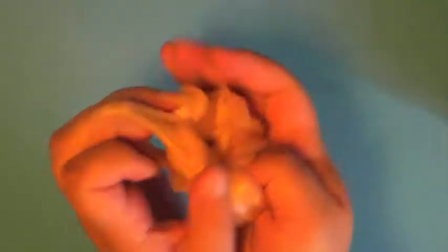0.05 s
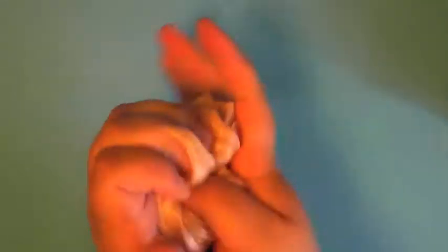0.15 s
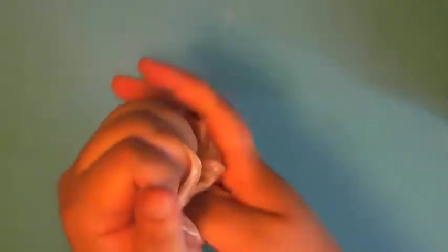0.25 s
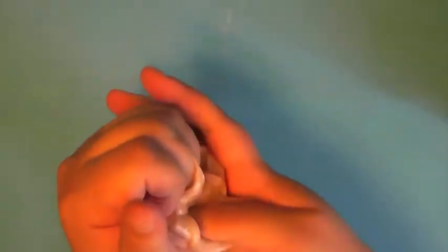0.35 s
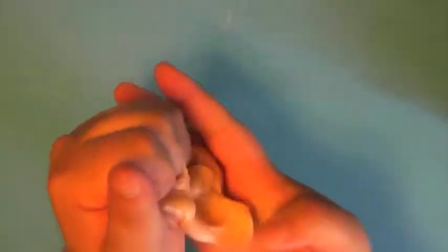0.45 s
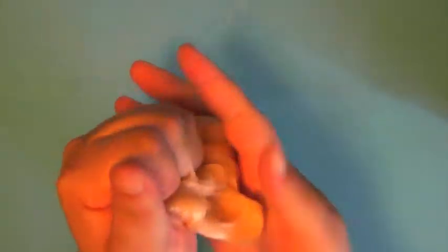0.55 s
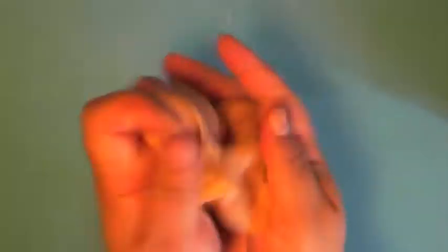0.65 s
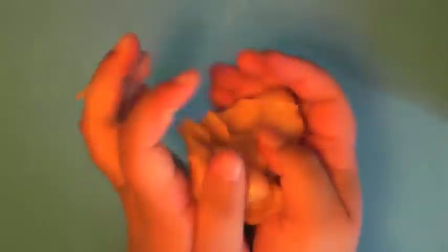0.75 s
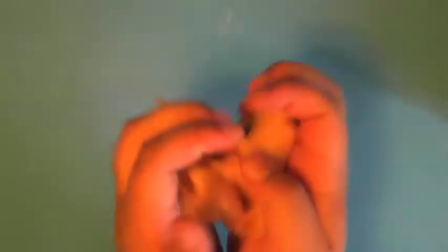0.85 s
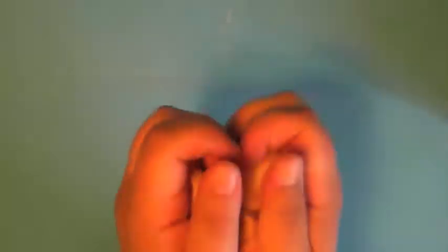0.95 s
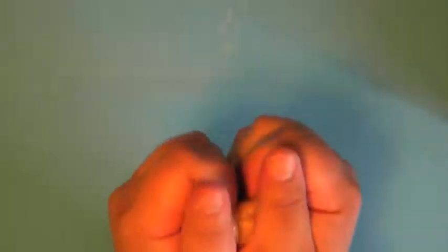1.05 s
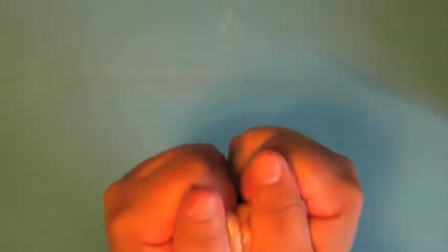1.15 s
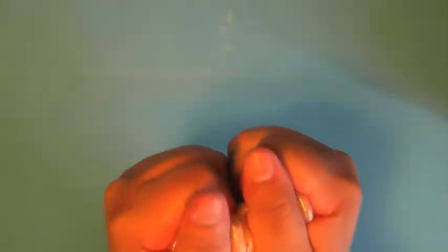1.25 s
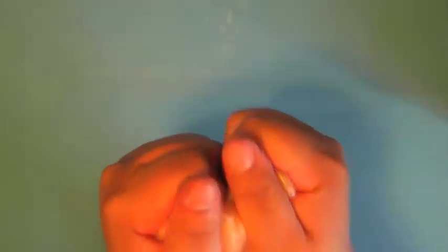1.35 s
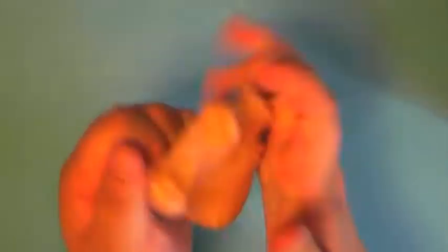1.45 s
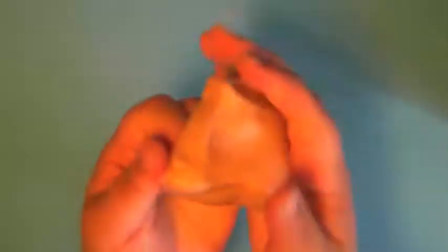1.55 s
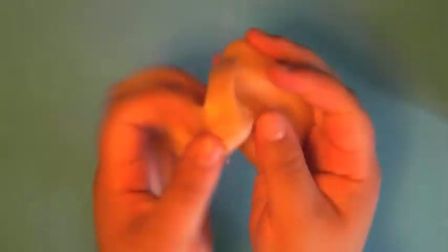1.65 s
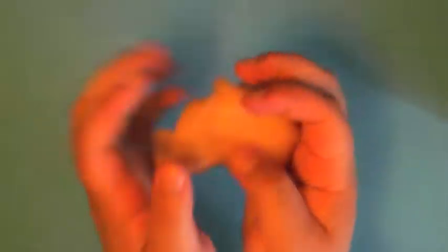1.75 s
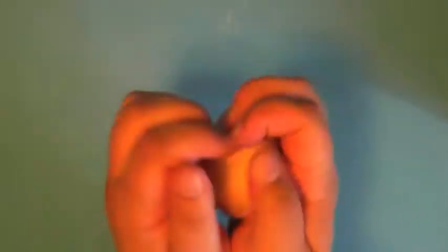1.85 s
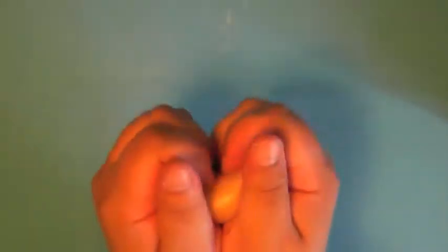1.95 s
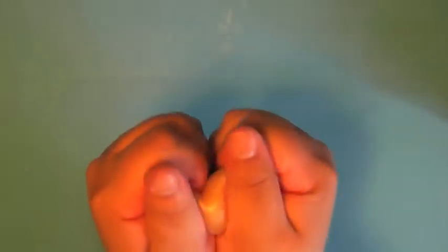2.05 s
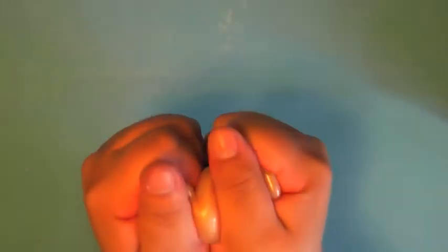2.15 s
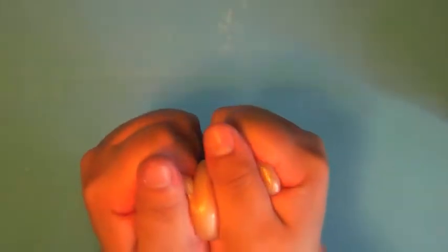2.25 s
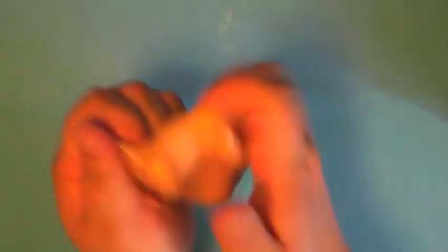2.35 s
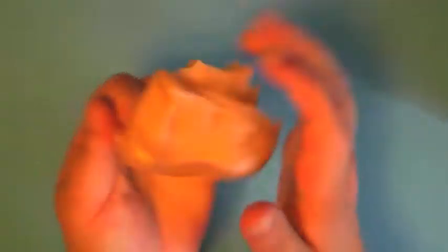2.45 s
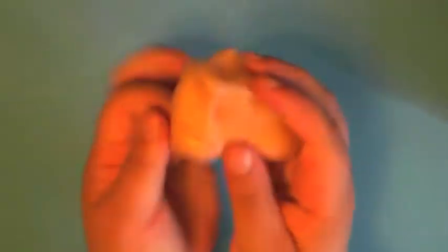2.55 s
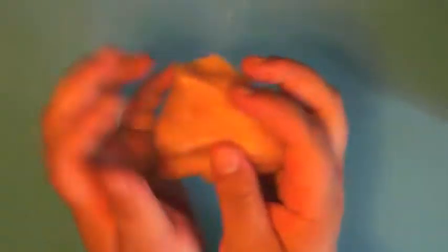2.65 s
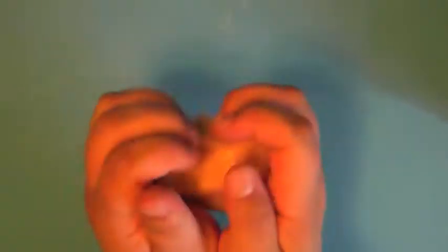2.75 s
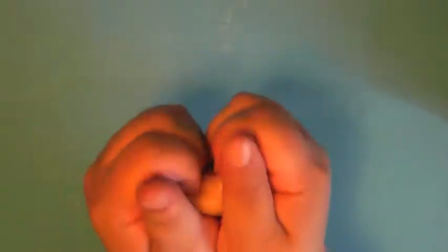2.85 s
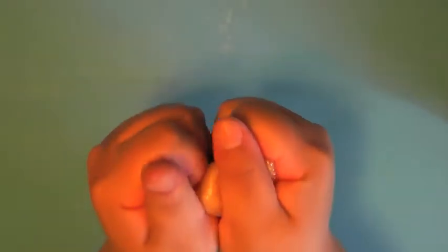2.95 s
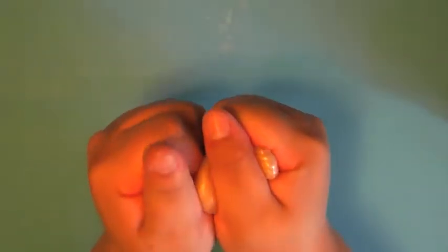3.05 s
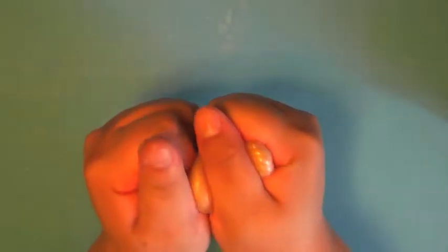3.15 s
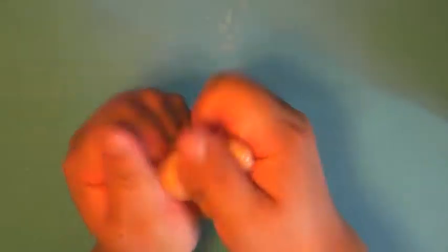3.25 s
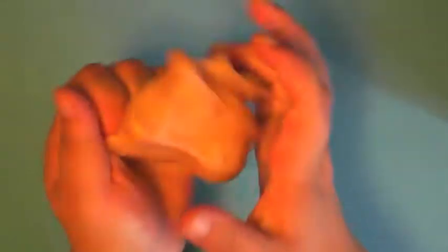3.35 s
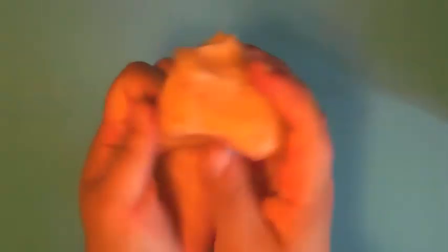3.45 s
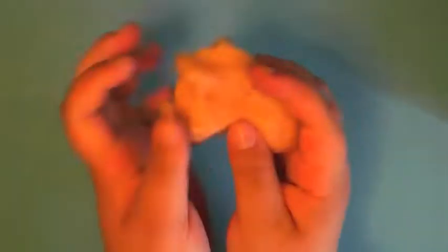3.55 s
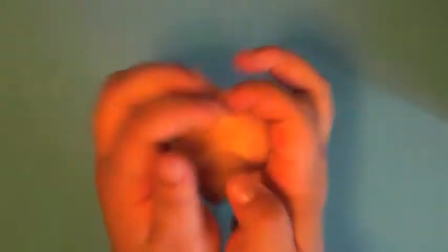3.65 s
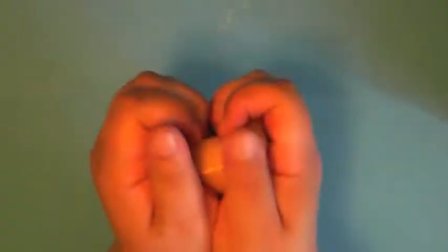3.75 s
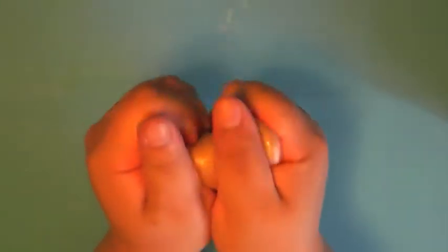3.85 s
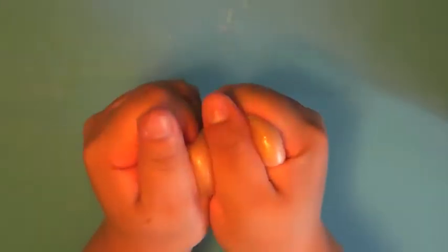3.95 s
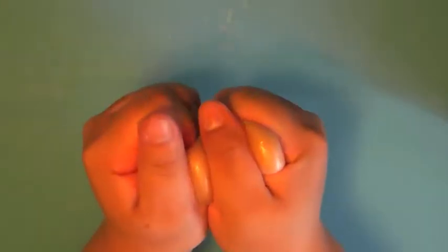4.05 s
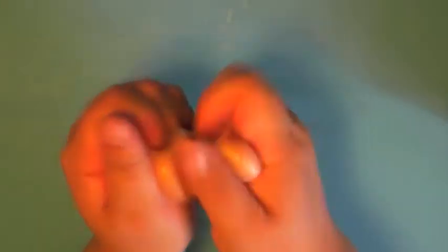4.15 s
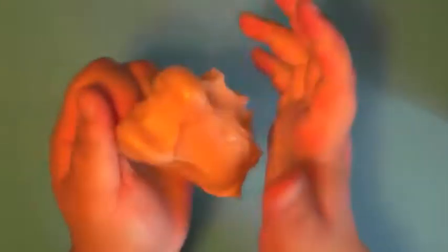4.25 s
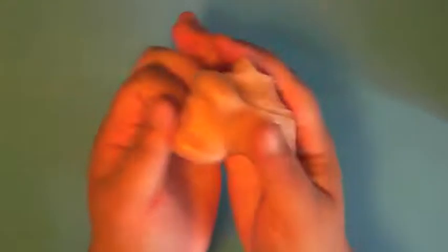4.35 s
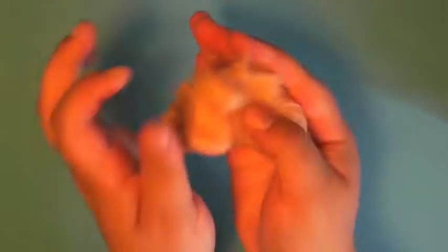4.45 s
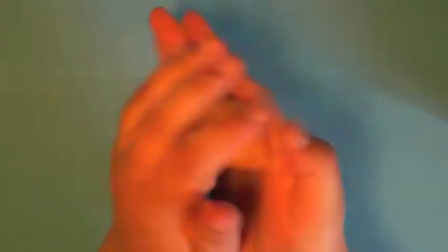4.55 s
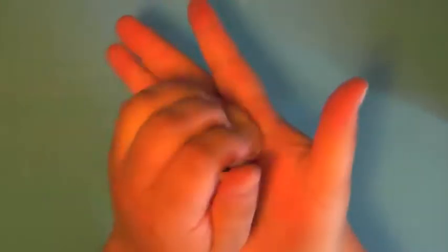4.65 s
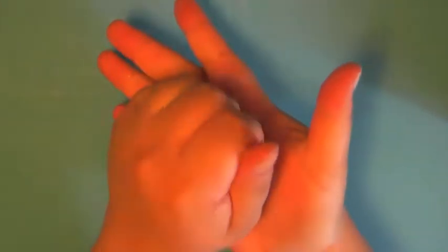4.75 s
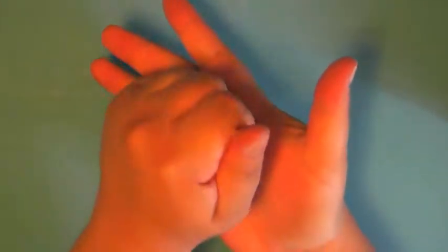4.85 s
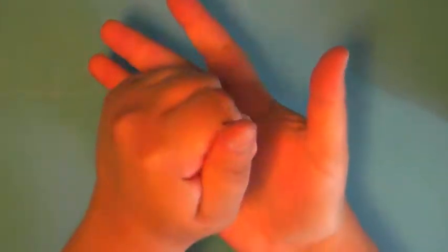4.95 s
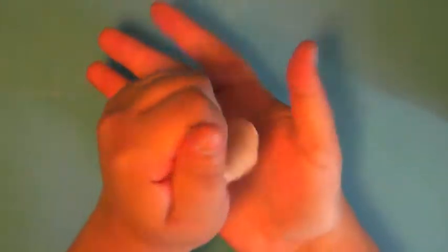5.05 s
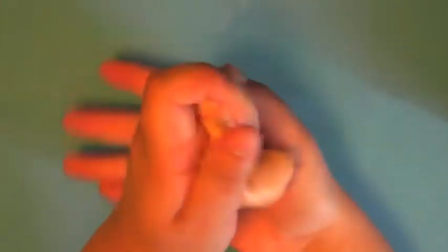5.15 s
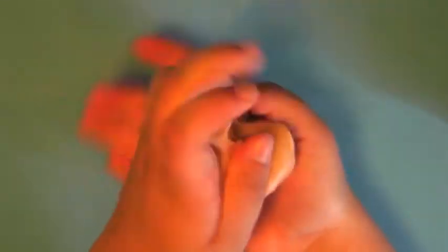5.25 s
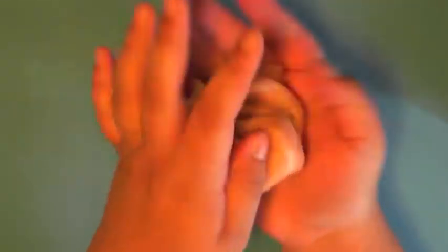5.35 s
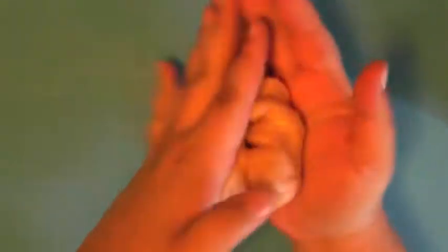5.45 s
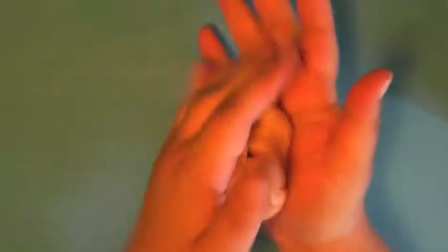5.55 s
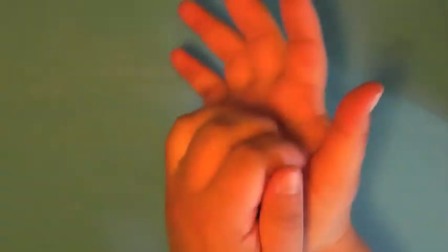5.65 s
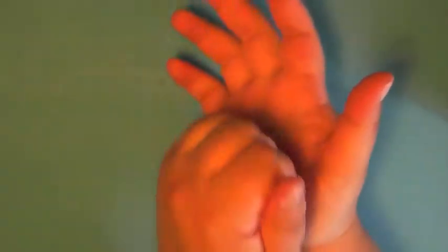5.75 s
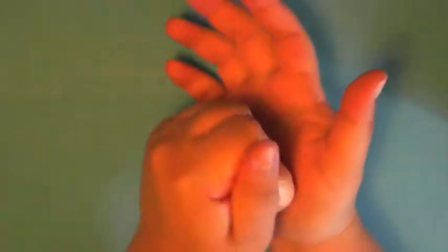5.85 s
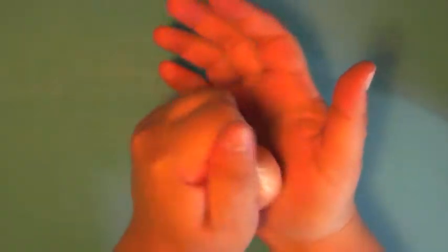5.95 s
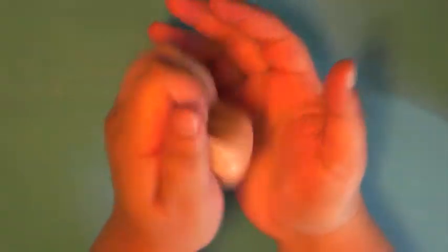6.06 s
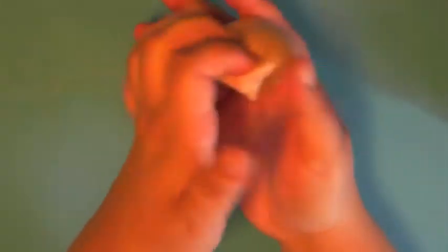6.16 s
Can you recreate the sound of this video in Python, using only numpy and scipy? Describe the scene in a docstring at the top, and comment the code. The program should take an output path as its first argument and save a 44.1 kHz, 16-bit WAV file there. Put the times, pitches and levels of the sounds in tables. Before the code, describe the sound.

Hands knead sticky wet slime up close, squishy fizzing peels alternating with clusters of sharp snapping pops and small low thuds in a quiet humming room.

```python
"""A quiet room, where two hands knead a lump of sticky slime close to a pair of microphones.
Over a patchy room hum, wet films peel off the skin stroke by stroke: trains of tiny rings and hiss make a
squishy fizz. Trapped air pockets burst as short puffs of ringing noise with a brief room tail. The hardest
pops saturate the microphones and come with low thuds, and gain control ducks the whole sound after loud pops."""
import sys
import numpy as np
from scipy import signal
from scipy.fft import rfft, irfft
from scipy.io import wavfile
from scipy.ndimage import uniform_filter1d

SR = 44100
rng = np.random.default_rng(int(sys.argv[2]) if len(sys.argv) > 2 else 0)


def unload_audio(sound):
    """Save the sound as a 16-bit wav file, at the path given as the first command line argument."""
    columns = np.transpose(np.atleast_2d(sound))
    # keep every value between -1 and 1, then stretch to whole-number steps
    steps = np.round(np.clip(columns, -1, 1) * 32767)
    wavfile.write(sys.argv[1], SR, steps.astype(np.int16))


N = 273420

# Strokes of slime peeling off skin. Each row: peak in seconds, rise in seconds, fall in seconds, fizz level
# in dB, squelch level in dB, pitch of the low hollow in Hz, pitch of the high hollow in Hz.
PEEL_STROKES = [(0.15, 0.19, 0.15, -52.5, -53.5, 1790, 4300),
                (0.45, 0.089, 0.087, -39.5, -36.5, 2180, 4300), (0.767, 0.11, 0.061, -35, -40, 1740, 4200),
                (0.87, 0.16, 0.11, -57.5, -65, 1800, 4160), (1.08, .1, 0.038, -52.5, -63, 1800, 4340),
                (1.24, .08, 0.08, -55, -47, 1800, 4200), (1.497, 0.074, 0.059, -35.5, -39.5, 2010, 4300),
                (1.64, 0.27, 0.07, -54.5, -65, 1810, 4150), (1.736, 0.087, 0.069, -41, -43, 1780, 3430),
                (1.82, 0.03, 0.055, -49, -58, 1730, 3830), (2.44, 0.076, 0.067, -35.5, -38, 686, 4400),
                (2.588, 0.093, 0.13, -41.5, -41, 1780, 3640), (2.99, 0.06, 0.12, -52.5, -66, 1620, 4300),
                (3.38, 0.096, 0.09, -37, -44, 1760, 4330), (3.491, 0.034, 0.045, -44, -46.5, 1700, 3780),
                (3.588, 0.087, 0.056, -39, -46, 1800, 8700), (3.698, 0.063, 0.024, -52, -63, 1760, 4030),
                (3.87, 0.12, 0.081, -59, -74, 1770, 4200), (4.248, 0.059, 0.062, -36, -42, 980, 3800),
                (4.287, 0.065, 0.039, -40, -45, 2395, 3600), (4.462, 0.15, 0.091, -42.5, -46.5, 1690, 3840),
                (4.62, 0.11, 0.13, -60, -69, 820, 2780), (4.92, 0.19, 0.1, -56, -70, 1760, 4200),
                (5.217, 0.074, 0.066, -36, -45, 1090, 7200), (5.315, 0.073, 0.045, -42.5, -45, 1820, 3500),
                (5.375, 0.068, 0.079, -42, -52.5, 1740, 8500), (5.519, 0.036, 0.035, -46, -53, 1760, 4100),
                (5.84, 0.22, .3, -58, -68, 1780, 4400), (6.19, .18, 0.15, -42.5, -48.5, 667, 4300)]
# The hardest pops. Each row: start in seconds, thud level in dB, level of the left-against-right swing in dB,
# its side (+1 left pushes, -1 right pushes), level of the fizz let go in dB.
HARD_POPS = [(0.4991, -20.5, -20, 1, -49), (0.5245, -30, -37, 1, -53), (0.5859, -20, -26, -1, -66),
             (1.1374, -33, -34, 1, -35), (1.148, -16.5, -19, 1, -42), (1.1924, -15, -20, 1, -29),
             (1.3, -17, -19, 1, -44), (1.3316, -28, -12, 1, -40), (2.0738, -19, -20, -1, -34),
             (2.109, -55, -20, 1, -62), (2.1297, -20, -12.5, 1, -44), (2.177, -58, -22, 1, -60),
             (2.214, -26, -5.5, -1, -53), (3.0318, -23.5, -17.5, 1, -48), (3.0458, -49, -14, -1, -40.5),
             (3.136, -13.5, -5, 1, -26.5), (3.9435, -19, -18, 1, -38), (3.9574, -20, -22, 1, -49),
             (4.0574, -13.5, -24, -1, -39.5), (4.9072, -27, -22, -1, -77), (4.9794, -27, -22, 1, -77),
             (5.9367, -41, -24, 1, -61), (5.9625, -24.5, -28, 1, -55)]


def gain_of(db):
    """Amplitude factor for a level in dB."""
    return 10 ** (np.asarray(db) / 20)


def evened(x):
    """Scales x to an rms of 1."""
    return x / np.sqrt(np.mean(x ** 2) + 1e-20)


def read(points, hz):
    """Reads a curve of (Hz, value) points, interpolated along log frequency."""
    f, value = np.transpose(points)
    return np.interp(np.log(hz + 1), np.log(f + 1), value)


def add(mix, s, sound):
    """Adds a sound to the mix from s seconds on, cut off at the end of the mix."""
    part = mix[..., round(s * SR):][..., :sound.shape[-1]]
    part += sound[..., :part.shape[-1]]


def coloured(x, spectrum):
    """Filters x by a curve of gains in dB, at rms 1."""
    gains = gain_of(read(spectrum, np.fft.rfftfreq(len(x), 1 / SR)))
    return evened(irfft(rfft(x) * gains, len(x)))


def wander(seconds):
    """Smoothed chance of rms 1: noise averaged twice over the given time."""
    size = max(round(seconds * SR), 2)
    return evened(uniform_filter1d(uniform_filter1d(rng.standard_normal(N), size), size))


def hum():
    """Room noise in drifting patches, left and right least alike around 1 kHz, with narrow whirrs in both."""
    # Spectrum of the room noise. Each row: frequency in Hz, relative level in dB per Hz.
    hum_shape = [(15, -40), (25, -55), (121, 5), (445, -1), (600, -6.5), (1180, -8), (1640, -14.5),
                 (1930, -18.5), (3700, -45), (5130, -95), (15200, -90), (16500, -30)]
    # Likeness of the two sides in the broad noise. Each row: frequency in Hz, correlation from 0 to 1.
    likeness = [(60, 0.34), (240, 0.4), (950, 0.073), (3770, 0.13), (15000, 0.48)]
    # Whirrs. Each row: centre in Hz, width in Hz, median level in dB against the broad noise.
    whirrs = [(459, 33, -11), (1639, 106, -10.5)]
    frames, hz = N // 256 + 5, np.fft.rfftfreq(1024, 1 / SR)
    a, b, c, d, patches = rng.standard_normal((frames, 513, 5)).T
    patches = evened(uniform_filter1d(uniform_filter1d(patches, 8, 0), 14, 1))
    same = np.clip(read(likeness, hz), -1, 1)[:, None]
    left = a + 1j * b
    right = same * left + np.sqrt(1 - same ** 2) * (c + 1j * d)
    spectra = np.array([left, right]) * gain_of(read(hum_shape, hz)[:, None] + 2 * patches)
    out = evened(signal.istft(spectra, nperseg=1024, noverlap=768)[1][:, :N])
    for centre_hz, width_hz, db in whirrs:
        band = signal.iirpeak(centre_hz, centre_hz / width_hz, SR)
        whirr = evened(signal.filtfilt(*band, rng.standard_normal(N)))
        out = out + gain_of(db + 2 * wander(0.084)) * whirr
    return gain_of(-53) * out


def grains(low_hz, high_hz, cycles, per_s, spread_db, count):
    """Tiny films snapping: short rings of rising pitch, each pitch on its own sparse train of clicks."""
    out = np.zeros(N)
    clump = gain_of(4.5 * wander(0.0036))  # films let go in clumps
    for hz in np.geomspace(low_hz, high_hz, count):
        u = np.arange(int(3 * cycles * SR / hz)) * hz / SR  # time in cycles
        ring = np.sin(2 * np.pi * u * (1 + 0.017 * u)) * np.exp(-u / cycles) * np.minimum(u, 1)
        ring = ring * hz ** .5 / np.linalg.norm(ring)
        snaps = rng.random(N) < per_s / count / SR * clump
        size = gain_of(spread_db * np.minimum(rng.exponential(1, N), 5))
        out += signal.oaconvolve(size * snaps, ring)[:N]
    return evened(out)


def swell(rise_s, fall_s):
    """A stroke of peak 1 with a round top, curving into silence at both ends."""
    t = np.arange(0, rise_s + fall_s, 1 / SR)
    ramp = np.clip(np.minimum(t / rise_s, (rise_s + fall_s - t) / fall_s), 0, 1)
    return np.sin(np.pi / 2 * ramp) ** 2.84  # a higher power makes the stroke more pointed


def efforts():
    """Gains of fizz and squelch: each stroke swells and ebbs, each hard pop lets a little more film go."""
    rest_fizz_db, rest_squelch_db = -61.5, -58  # always present beneath the strokes
    after_rise_s, after_fizz_s, after_squelch_s = 0.0027, 0.14, 0.074  # swell after a hard pop
    after_squelch_db = -14  # against the fizz let go
    fizz, squelch = np.zeros((2, N + SR))  # one second of lead-in, cut off below
    for s, rise_s, fall_s, fizz_db, squelch_db, _, _ in PEEL_STROKES:
        stroke = swell(rise_s, fall_s)
        add(fizz, 1 + s - rise_s, gain_of(fizz_db) * stroke)
        add(squelch, 1 + s - rise_s, gain_of(squelch_db) * stroke)
    for s, *_, fizz_db in HARD_POPS:
        add(fizz, 1 + s, gain_of(fizz_db) * swell(after_rise_s, after_fizz_s))
        add(squelch, 1 + s, gain_of(fizz_db + after_squelch_db) * swell(after_rise_s, after_squelch_s))
    return fizz[SR:] + gain_of(rest_fizz_db), squelch[SR:] + gain_of(rest_squelch_db)


def hollows():
    """Pitches of the low and high hollow: each stroke's pair is held until halfway up the next rise."""
    shift_s = 0.014  # time in which the hands find their next shape
    s, rise_s, *_, low_hz, high_hz = np.transpose(PEEL_STROKES)
    starts = np.maximum.accumulate(s - rise_s / 2)
    stroke = np.maximum(np.searchsorted(starts, np.arange(N) / SR) - 1, 0)
    return [uniform_filter1d(hz[stroke], round(shift_s * SR)) for hz in (low_hz, high_hz)]


def resonate(x, hz, width_hz):
    """Shifts the curve hz down to zero, smooths, and shifts back: a moving resonance, at rms 1."""
    turn = np.exp(2j * np.pi * np.cumsum(hz) / SR)
    r = np.exp(-np.pi * width_hz / SR)
    return evened((turn * signal.lfilter([1 - r], [1, -r], x / turn)).real)


def peel():
    """Fizz and squelch: grains over a fine wet hiss, ringing in the hollows, swelling with each stroke."""
    # Tone filters for the fizz and the squelch. Each row: frequency in Hz, relative gain in dB.
    fizz_shape = [(1180, -70), (2000, 10.5), (2490, -2.5), (3710, -0.5), (10700, -2), (15100, -7.5),
                  (16100, -38), (16500, -48)]
    squelch_shape = [(240, -46), (400, 11), (524, -2), (673, 9), (989, 5.5), (1820, 6), (2490, 0.5),
                     (4000, 6), (5200, -4), (8800, -120)]
    fizz_gain, squelch_gain = efforts()
    low_hz, high_hz = hollows()
    fizz = grains(2525, 14000, cycles=4.0, per_s=9000, spread_db=3.0, count=16)
    fizz = fizz + 0.34 * rng.standard_normal(N)
    squelch = grains(477, 3254, cycles=2.65, per_s=4000, spread_db=4.0, count=14)
    squelch = squelch + 1.1 * rng.standard_normal(N)
    fizz = coloured(fizz, fizz_shape) + 0.41 * resonate(fizz, high_hz, width_hz=510)
    clumps = gain_of(4 * wander(.012))  # the hollow opens and closes in wet clumps
    squelch = coloured(squelch, squelch_shape) + .6 * clumps * resonate(squelch, low_hz, width_hz=280)
    grip = gain_of(2 * wander(0.025))  # the skin grips and slips
    return grip * (evened(fizz) * fizz_gain + evened(squelch) * squelch_gain)


def small_pops():
    """Rows of small bursts, laid out like the air pockets, scattered by chance around the hard pops."""
    each, within_s = 3, .035  # pockets per hard pop, spread of their times
    when, level, pitch, length = rng.standard_normal((len(HARD_POPS) * each, 4)).T
    s = np.repeat([row[0] for row in HARD_POPS], each) + within_s * when
    db = -33 + 3 * level
    ring_hz = 9600 + 2200 * np.tanh(pitch)
    ms = .9 * gain_of(2.3 * length)
    return list(zip(s, db, ring_hz, ms))


def pops(skirt_db=-14, unlike=0.25, wider=2.16):
    """Each burst is a short puff of noise ringing around its pocket's pitch, with a wide skirt.
    Also gives the same energy summed over all directions, which is wider and feeds the room."""
    # Bursting air pockets. Each row: start in seconds, level in dB before the microphones saturate,
    # pitch of the ring in Hz, length scale in ms.
    air_pockets = [(0.1044, -37.5, 8500, 5.6), (0.2073, -21.5, 6900, 2.3), (0.331, -26.5, 4450, 0.89),
                   (0.3748, -35, 9700, 3.8), (0.4724, -17, 4600, 0.57), (0.4969, -4, 8300, 0.27),
                   (0.5236, -5, 7850, 0.75), (0.5556, -17.5, 8140, 1.1), (0.5846, 1.5, 8200, 0.9),
                   (0.617, -19.5, 11300, 1.3), (0.6779, -21, 9600, 2.3), (0.7296, -39, 5950, 4.3),
                   (0.9203, -39, 2980, 3.5), (0.9274, -35.5, 9800, 1.9), (1.0637, -33, 11300, 4),
                   (1.0707, -30.5, 5600, 3.4), (1.119, -22, 11700, 2), (1.1259, -11.5, 4700, 0.63),
                   (1.1366, -9, 5600, 0.89), (1.1486, -15, 5630, 3.3), (1.1673, -24, 6200, 2.2),
                   (1.1831, -13, 10300, 1.6), (1.1895, 7, 7340, 1.4), (1.198, -9, 10700, 3),
                   (1.2203, -24, 7500, 1.1), (1.2374, -24, 4630, 2.2), (1.254, -19, 11400, 1.1),
                   (1.2862, -14.5, 11100, 1), (1.2984, -7.5, 13500, 2), (1.3297, 6.5, 11040, 2.07),
                   (1.617, -40, 9700, 3.1), (1.987, -27.5, 6800, 2), (2.0352, -28, 4050, 2.2),
                   (2.0433, -21, 4170, 0.92), (2.046, -16.5, 3600, 1), (2.0604, -13, 11800, 0.8),
                   (2.0711, -6.5, 6400, 1.9), (2.082, -17, 10000, 1.1), (2.098, -17, 5000, 2.7),
                   (2.108, -11.5, 7160, 1.4), (2.1284, -1.5, 7500, 1.25), (2.158, -15, 10000, 1.1),
                   (2.1774, -10.5, 7700, 1.6), (2.1963, -20, 13500, 0.7), (2.2122, -11.5, 12000, 1.3),
                   (2.239, -27, 12100, 1.6), (2.2691, -26, 12800, 0.75), (2.3177, -33, 6400, 2.2),
                   (2.3649, -27, 9700, 0.51), (2.4848, -33.5, 7550, 9), (2.804, -37, 4120, 2),
                   (2.899, -52, 8900, 1.5), (2.949, -34.5, 4040, 2), (3.0137, -29, 8000, 1.8),
                   (3.0308, -18, 9500, 2.5), (3.0456, 9, 9840, 0.82), (3.072, -8, 7550, 1.3),
                   (3.0945, -12.5, 8300, 0.68), (3.1283, -19, 4360, 1.6), (3.1348, 12.5, 8250, 1.4),
                   (3.184, -14, 9000, 1.1), (3.2294, -25, 12100, 0.91), (3.3468, -16.5, 7850, 0.55),
                   (3.459, -36, 10500, 1.4), (3.4802, -40, 5900, 2.5), (3.7602, -36.5, 4130, 2.1),
                   (3.787, -42, 9500, 1), (3.8171, -26, 4350, 4), (3.8984, -34.5, 8900, 1.7),
                   (3.9195, -22, 4500, 0.49), (3.9424, -11.5, 8800, 1.3), (3.9574, -1.5, 7500, 1.4),
                   (3.9683, -19, 7400, 1.5), (4.0536, -23, 12300, 1.2), (4.0567, 4.5, 11830, 1.19),
                   (4.0704, -1, 10100, 0.43), (4.191, -40, 10000, 1.4), (4.3214, -28.5, 9350, 2.1),
                   (4.6275, -36.5, 2300, 2.7), (4.665, -50, 10500, 1.4), (4.767, -28, 5140, 1.6),
                   (4.8067, -18.5, 7860, 1.36), (4.8439, -27, 11900, 1.7), (4.8496, -21.5, 12400, 1.3),
                   (4.863, -27, 8000, 2.1), (4.8932, -24, 7800, 1.3), (4.9014, -24, 10400, 0.86),
                   (4.9057, -16, 12200, 0.93), (4.9313, -19, 9800, 0.45), (4.9482, -30, 10800, 1.1),
                   (4.9782, -17.5, 14400, 1.05), (5.155, -36, 5100, 1.5), (5.2082, -16.5, 10600, 0.56),
                   (5.2333, -47, 6130, 1.2), (5.4661, -41.5, 2200, 3.1), (5.7705, -31, 8900, 3.6),
                   (5.8184, -24.5, 3140, 0.63), (5.8698, -19, 9300, 0.95), (5.885, -17, 10400, 0.76),
                   (5.9059, -35.5, 7450, 8.5), (5.9346, -13, 9100, 0.89), (5.9612, -1, 10200, 0.91)]
    out, around = np.zeros((2, N)), np.zeros(N)
    hz, t = np.fft.rfftfreq(512, 1 / SR), np.arange(512) / SR
    rows = [*air_pockets, *small_pops()]
    puffs = rng.standard_normal((len(rows), 2, 512))
    skirt = gain_of(skirt_db) * hz / (hz + 500)
    for (s, db, ring_hz, ms), puff in zip(rows, puffs):
        off = (hz - ring_hz) / (1920 + 0.036 * ring_hz)  # the ring widens with its pitch
        tone = irfft(rfft(puff) * (np.exp(-(off / 0.7) ** 2 / 2) + skirt))
        tone = tone / np.sqrt(uniform_filter1d(tone ** 2, 24, mode="wrap"))  # the film tears at an even force
        u = t * 1000 / ms  # time in lengths
        decay = np.exp(-.4 * u - np.maximum(u - .8, 0) / .25)  # slow at first, then steep
        shape = gain_of(db) * np.minimum(t / .0001, 1) * decay
        apart = unlike * np.minimum(u, 1) * tone[1]  # a second noise, opposite left and right, grows in
        add(out, s, np.array([tone[0] + apart, tone[0] - apart]) * shape)
        bands = gain_of(5 * np.cos(hz / 520 + 2 * puff[0, 0]))  # chance ripple of broad bands in each room tail
        click = irfft(bands * np.exp(-(off / wider) ** 2 / 2) + skirt / 2)
        click = np.roll(click, 48)[:96]
        add(around, s, click * np.linalg.norm(shape) / np.linalg.norm(click))
    return out, around


def room(x, unlike=0.022, build_s=0.00057):
    """A dense tail of echoes that builds up within a few ms, each band dying at its own speed."""
    # Decay of the room. Each row: frequency in Hz, time to fall by 60 dB in seconds.
    decay_times = [(500, 0.1), (1300, 0.077), (3500, 0.16), (9000, 0.19), (15000, 0.12)]
    hz, t, z = signal.stft(rng.standard_normal((2, SR // 2)), SR, nperseg=128)
    tail = signal.istft(z * gain_of(-60 * t / read(decay_times, hz)[:, None]), SR, nperseg=128)[1]
    tail = tail * (1 - np.exp(-np.arange(tail.shape[1]) / SR / build_s))
    sides = np.diff(tail[1], 2, append=[0, 0]) * np.array([[1], [-1]])  # mostly treble, opposite left and right
    tail = tail[0] + unlike * sides
    return signal.fftconvolve(x[None], tail / np.linalg.norm(tail[0]), axes=1)[:, :N]


def swing(seconds, settle_hz):
    """A push that rises and fades; the input passes no steady push, so it overshoots and settles."""
    u = np.arange(1500) / SR / seconds
    push = signal.lfilter(*signal.butter(2, settle_hz, "high", fs=SR), u ** 2 * np.exp(-u))
    return push / push.max()


def thuds(snap=0.82, uneven=0.11):
    """An overloaded capsule snaps and swings low; the two capsules differ by a quicker swing and in strength."""
    out, against = np.zeros((2, N)), swing(0.00016, 97)
    common = -swing(0.0004, 37.5) - snap * swing(0.00014, 225)
    for s, common_db, against_db, side, _ in HARD_POPS:
        both = gain_of(common_db) * common
        apart = np.sign(side) * gain_of(against_db) * (against - uneven * common)
        add(out, s, np.array([both + apart, both - apart]))
    return out


def scene():
    """The capsules saturate on the hardest pops, sooner on the push than on the pull; thuds lie on top."""
    (burst, around), wet = pops(), peel()
    treble = 0.037 * np.diff(wet, 2, append=[0, 0])  # the fizz's treble differs a little, oppositely left and right
    near = (burst + np.array([wet + treble, wet - treble])) * gain_of([[.3], [-.3]])  # left a little louder
    air = near + gain_of(-12.0) * room(around) + gain_of(-14) * room(wet) + hum()
    ceiling, lean = .5, 0.23
    return ceiling * (np.tanh(air / ceiling + lean) - np.tanh(lean)) + thuds()


def record(dry):
    """Gain control ducks everything after loud pops and recovers; then the treble is cut at the band limit."""
    power_db = 10 * np.log10(abs(uniform_filter1d((dry ** 2).mean(0), 132)) + 1e-12)
    fall = np.arange(N) * 55.2 / SR  # the held level falls by this many dB a second
    held_db = np.maximum.accumulate(power_db + fall) - fall
    over_db = np.maximum(held_db + 24.0, 0)  # excess above -24 dB
    late = np.roll(uniform_filter1d(over_db, 90), 190)  # it reacts about 4 ms late, after the pop has passed
    ducked = dry / gain_of(0.83 * late)
    band_limit = signal.firwin(511, 15900, window=("kaiser", 9), fs=SR)  # cutoff in Hz
    return signal.oaconvolve(ducked, band_limit[None], "same")


dry = scene()
out = record(dry)
unload_audio(out)
```